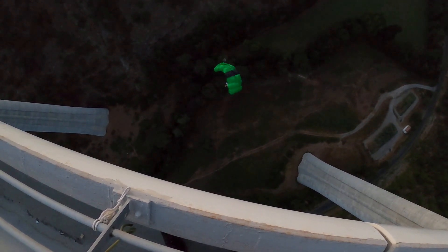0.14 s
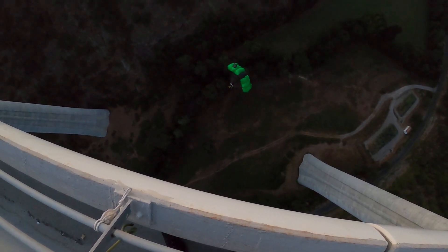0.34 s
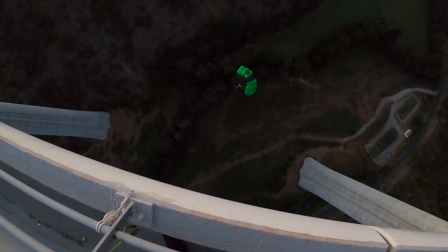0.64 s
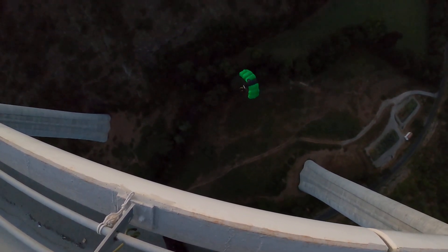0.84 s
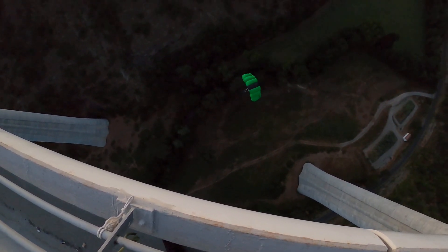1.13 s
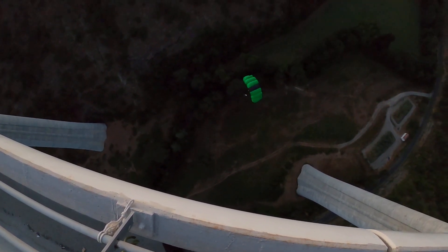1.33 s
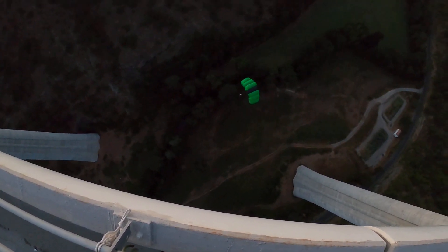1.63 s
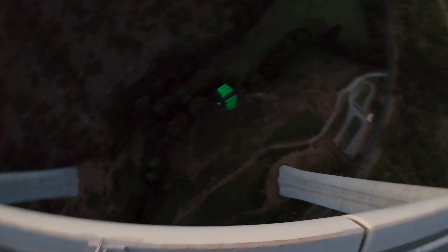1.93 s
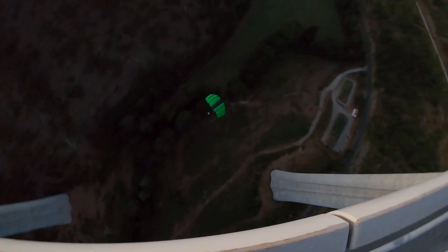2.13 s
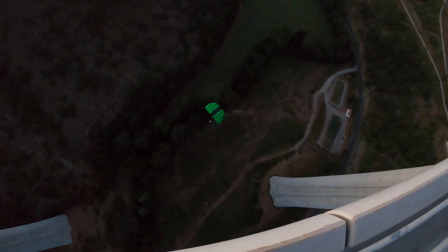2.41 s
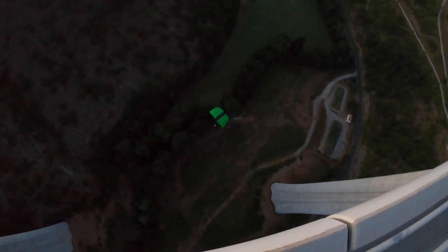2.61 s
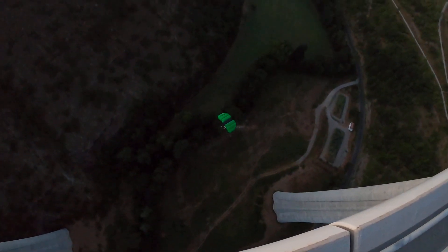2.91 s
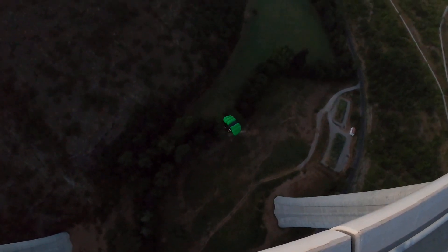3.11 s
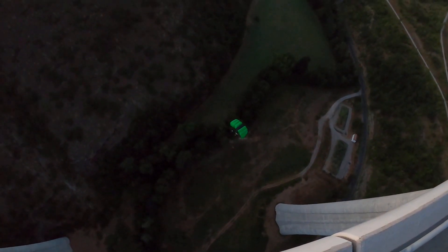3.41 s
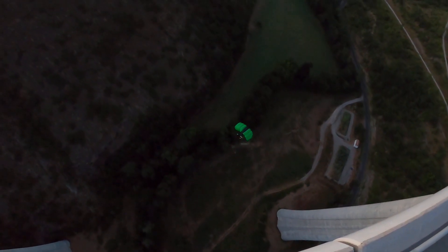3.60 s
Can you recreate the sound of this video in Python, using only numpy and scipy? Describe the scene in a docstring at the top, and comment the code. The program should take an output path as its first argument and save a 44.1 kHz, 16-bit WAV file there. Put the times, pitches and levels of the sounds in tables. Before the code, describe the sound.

Outdoors on a high road bridge, a canopy cracks open with rapid cloth slaps, echoes softly once, and leaves steady traffic wash, faint ticks, engine drone and low gusts at the microphone.

```python
"""A high road bridge over a valley: a parachute cracks open far below and the valley floor sends the bang back.
Cloth is banded noise with crackles, slaps and ticks are short rings; the echo is a late, smeared, dull copy.
Traffic on the deck, mostly to the left, is banded noise for tyres and rumble with a wavering engine drone.
A gust buffets the two microphone ports as lumpy low noise."""
import sys
import numpy as np
from scipy import signal
from scipy.fft import rfft, irfft, next_fast_len
from scipy.io import wavfile

SR = 44100
rng = np.random.default_rng(int(sys.argv[2]) if len(sys.argv) > 2 else 0)


def to_wav(sig):
    """Store sig (one row per channel, or 1-D mono) as 16-bit WAV at the path in sys.argv[1].

    Samples outside -1..1 are clipped; the rate is SR.
    """
    pcm = np.clip(np.atleast_2d(sig), -1, 1) * 32767
    pcm = np.round(pcm).astype(np.int16)
    wavfile.write(sys.argv[1], SR, pcm.T)  # frames by channels


def gain_from_db(level_db):
    """Turn a decibel level (scalar or array-like) into a linear amplitude factor."""
    decades = np.asarray(level_db, float) / 20
    return 10 ** decades


N = 165375

# opening canopy: start_s, cloth_db (before the trims), roar_db of air filling the cells (relative to cloth_db)
OPENING = [(0, -45.5, 31), (.04, -43.5, -9.5), (.09, -42.5, 15.5), (.145, -31, -4.5), (.2, -32.5, 18),
           (.228, -28, 13), (.27, -25, 12.5), (.325, -26, 13.5), (.352, -29, 11.5), (.38, -27.5, 17),
           (.455, -30.5, 0.5), (.475, -31.5, 4.5), (.5, -36.5, 3), (.545, -42.5, 8.5), (.61, -46, 19),
           (.68, -54, -7.5), (.86, -62, -2)]
# slaps of cells snapping full: start_s, level_db, pitch_hz
SLAPS = [(.002, -24, 123), (.067, -20, 299), (.164, -14.5, 160), (0.1893, -6, 218), (0.215, -21, 145),
         (0.242, -8, 191), (0.259, -5, 162), (.282, -21, 205), (0.295, -4, 240), (0.305, -9, 199),
         (.319, -1.5, 190), (0.331, -14, 184), (0.366, -15, 214), (.381, -8.5, 267), (0.403, -19, 144),
         (0.427, -25, 149)]
# small ticks of lines and gear: start_s, level_db, pitch_hz, left_minus_right_db
TICKS = [(0.1873, -19, 1230, -1), (0.04, -30, 2660, 2), (0.07, -33, 2530, 1), (.460, -16.5, 3500, .1),
         (.398, -24, 5300, 0), (0.547, -35, 2600, -8), (0.605, -27, 2470, -2.5), (0.659, -41, 4200, -1),
         (.693, -35.5, 3540, -5.5), (0.738, -35, 2720, -1.1), (0.808, -52.5, 6880, 6),
         (0.832, -43, 4040, -4), (0.855, -30.5, 1234, 1), (1.233, -45, 5900, 6), (1.384, -33, 2520, -3),
         (2.213, -38, 4820, 8), (2.303, -44, 4340, 2.5), (2.449, -31, 2200, -1), (2.467, -32.5, 4630, -3.5)]
# spectrum of the cloth rustle: freq_hz, level_db (per Hz)
RUSTLE_SPECTRUM = [(200, -27), (320, -4.5), (420, -5.5), (750, -4.5), (1050, -5), (1450, -13), (1650, -8),
                   (2250, -16.5), (2700, -8.5), (3100, -14), (4250, -14.5), (4700, -17.5), (7200, -26.5),
                   (16000, -35.5)]
# spectrum of the air roaring into the cells: freq_hz, level_db (per Hz)
ROAR_SPECTRUM = [(15, -35), (25, -27), (49, -4.5), (81, -24.5), (110, -11.5), (150, -2.5), (199, -1),
                 (270, -10), (350, -6), (430, -13.5), (600, -17.5), (780, -34), (1320, -85.5)]
# stereo image of the canopy: freq_hz, left_right_likeness (-1 to 1), left_lead_rad
CLOTH_ALIKE = [(61.2, 1, 0.32), (240, .99, -.05), (1010, 1, -0.28), (2240, 0.94, -0.54),
               (4300, 0.87, -0.44), (8000, 0.6, -1.1)]
# traffic: start_s, tyre_roar_db, tyre_hiss_db, high_air_db, left_minus_right_db, rumble_db
TRAFFIC = [(0, -37.5, -66, -59, -1, -34.5), (.5, -37.5, -51, -66, -2.5, -34.5),
           (.75, -44, -60.5, -62, 3.5, -40), (1.1, -38.5, -50, -50.5, -1, -34),
           (1.4, -36, -49.5, -51.5, 4, -35), (1.7, -38.5, -41.5, -54.5, 6, -34),
           (2.0, -38, -41.5, -53.5, 6, -33.5), (2.2, -38, -42, -52.5, 4.5, -30.5),
           (2.32, -36, -43.5, -58, 3.5, -33), (2.5, -37.5, -45.5, -54.5, 4.5, -28.5),
           (2.8, -40, -45, -60, 4.5, -29), (3.0, -37, -49.5, -58.5, 3.5, -28.5),
           (3.2, -34, -43, -58, 3, -31), (3.33, -34.5, -40, -57, 4, -31), (3.55, -36, -39.5, -54, 4, -31),
           (3.75, -34.5, -39.5, -56.5, 3.5, -30)]
# spectrum of the tyre roar: freq_hz, level_db (per Hz)
TYRE_SPECTRUM = [(210, -19.5), (350, 1), (630, -3.5), (930, 0), (1250, -6), (1700, -10), (2500, -22),
                 (4000, -46), (6000, -69.5)]
# spectrum of the tyre hiss: freq_hz, level_db (per Hz)
HISS_SPECTRUM = [(700, -39), (1250, -5), (1700, 3.8), (2600, -0.3), (3400, -7.5), (4200, -16.5),
                 (5500, -43.5), (8000, -71)]
# brightness of the tyre hiss: start_s, slope_db (per octave about 2 kHz)
HISS_COLOUR = [(0, 1.5), (1.3, 4), (1.9, -1.5), (2.2, 1.8), (2.8, -8.5), (3.1, 4.5), (3.45, -1),
               (3.75, -2.5)]
# a hump in the tyre noise that wanders in pitch: start_s, centre_hz, height_db
HUMP = [(1.2, 2540, 4.5), (1.45, 2230, 2.5), (1.7, 1500, 2), (1.95, 1147, 8.5), (2.15, 1300, 3),
        (2.5, 1700, 3.5), (2.9, 1000, 2), (3.15, 2300, 0.5), (3.3, 2560, 2.5), (3.45, 2580, 5),
        (3.6, 2300, 4), (3.75, 1600, 1)]
# spectrum of the high air of the traffic: freq_hz, level_db (per Hz)
AIR_SPECTRUM = [(1500, -47.5), (2800, -5), (4000, -4.5), (5100, -8.5), (6300, -15.5), (7400, -24.5),
                (16000, -41)]
# spectrum of a faint top hiss: freq_hz, level_db (per Hz)
SHEEN_SPECTRUM = [(4500, -44), (6300, -8.5), (7100, 2), (7800, 4.5), (16000, -14.5)]
# course of the top hiss: start_s, level_db
SHEEN_LEVEL = [(0, -68), (.85, -78), (1.4, -64), (2.3, -64.5), (2.8, -70.5), (3.2, -61.5), (3.75, -65)]
# stereo image of the tyres: freq_hz, left_right_likeness (-1 to 1), left_lead_rad
ROAD_ALIKE = [(300, 0.98, -0.26), (500, 0.85, -.2), (1000, 0.52, -0.12), (2000, .7, -1.05),
              (2980, 0.46, -0.71), (4200, 0.3, 0.36), (5370, 0.45, 1.5), (8050, 0.26, 0.76)]
# spectrum of the engine and deck rumble: freq_hz, level_db (per Hz)
RUMBLE_SPECTRUM = [(15, -38.5), (25, -16.5), (60, -5), (97, -4.5), (162, -6.5), (248, -8.5), (340, -16),
                   (450, -24), (650, -42.5), (1100, -98.5)]
# stereo image of the rumble: freq_hz, left_right_likeness (-1 to 1), left_lead_rad
RUMBLE_ALIKE = [(60, .995, 0), (130, .995, .03), (250, .98, 0), (500, .9, -.1)]
# engine drone: start_s, pitch_hz, level_db
DRONE = [(1.6, 115.3, -44), (2.05, 110.9, -38.5), (2.15, 110, -30), (2.25, 107.9, -39.5), (2.4, 104.8, -50),
         (3.0, 100.7, -44), (3.27, 97.8, -28.5), (3.5, 87.9, -35.5), (3.75, 88, -46)]
# wind on the ports: start_s, level_db
GUST = [(0, -42), (.17, -39.5), (.35, -70), (.7, -40), (.85, -51.5), (1.4, -59.5), (1.75, -42), (2.25, -57),
        (2.42, -26), (2.7, -26.5), (2.85, -43), (2.97, -31.5), (3.04, -45.5), (3.12, -64), (3.75, -69)]
# spectrum of the buffeting: freq_hz, level_db (per Hz)
BUFFET_SPECTRUM = [(20, -13.5), (45, 10), (80, -2), (140, -8.5), (250, -48), (400, -67.5)]
# stereo image of the wind: freq_hz, left_right_likeness (-1 to 1), left_lead_rad
WIND_ALIKE = [(20, 0.47, 0.005), (300, 0.54, 0.006)]
# microphone response: freq_hz, gain_db
MIC_RESPONSE = [(20, 0.5), (7400, -1.04), (7900, -11.5), (8400, -16.5), (10000, -22.5), (12000, -27.5),
                (15000, -40)]

RUSTLE_TRIM_DB, ROAR_TRIM_DB = 8, -3.5
CRACKLES_PER_S, CRACKLE_DB, CRACKLE_SPREAD_DB = 490, -8, 4.5
SLAP_SWELL_CYCLES, SLAP_CRACK_DB = 0.46, -11.5
TICK_SWELL_CYCLES, TICK_SPIT_DB, TICK_SPIT_S = 1.6, 5, 0.001
BANG_S, ECHO_S = 0.21, 0.922  # the sound leaving at BANG_S is back at ECHO_S
ECHO_DB, ECHO_FADE_DB_PER_S = -12.5, 8
ECHO_END_S, ECHO_END_DB_PER_S = 1.077, 70  # an extra fade sets in here
ECHO_LOW_HZ, ECHO_CUT_HZ, ECHO_TOP_HZ, ECHO_SMEAR_S = 110, 1340, 3600, 0.016
FALL_M_PER_S, SOUND_M_PER_S = 55, 343
HUMP_OCTAVES, AIR_PATCHY_DB = 0.38, 1.2
DRONE_WAVER_HZ, DRONE_STEADY = 15, 0.9  # steady tone against its wavering part
HISS_LEFT_DB, RUMBLE_LEFT_DB, BUFFET_LEFT_DB = 6, 1, 2.5  # left minus right
OVERLOAD = 1  # ceiling of the rounded peaks


def rms_one(x):
    """Scale to rms 1."""
    return x / np.sqrt(np.mean(x ** 2) + 1e-20)


def in_time(rows):
    """Draw straight lines through each column of a timed table."""
    s, *columns = np.transpose(rows)
    return [np.interp(np.arange(N) / SR, s, c) for c in columns]


def at_hz(points, hz, column=1):
    """Read a column of a frequency table along a log axis."""
    points = np.array(points)
    return np.interp(np.log(hz), np.log(points[:, 0]), points[:, column])


def pan(x, db):
    """Set left against right by a level difference in dB."""
    return x * gain_from_db(np.array([db / 2, -db / 2]).reshape(2, -1))


def white():
    """Two independent pairs of white noise."""
    return rng.standard_normal((2, 2, N))


def drift(rate):
    """Slow chance with spread 1: noise through two low-pass poles at rate Hz."""
    r = np.exp(-80 * np.pi * rate / SR)  # runs at SR / 40
    slow = signal.lfilter([1], [1, -2 * r, r * r], rng.standard_normal(N // 40 + 2002))[2000:]
    return np.interp(np.arange(N) / 40, np.arange(len(slow)), rms_one(slow))


def ring(s, db, hz, cycles):
    """A sine that swells over the given cycles and then dies, starting with a pull."""
    u = np.clip((np.arange(N) / SR - s) * hz / cycles, 0, 40)
    return -gain_from_db(db) * u * np.exp(1 - u) * np.sin(2 * np.pi * u * cycles)


def colour(x, points):
    """Shape the spectrum with a table of gains in dB."""
    size = next_fast_len(N + 4096)
    hz = np.arange(size // 2 + 1) * SR / size + 1
    return irfft(rfft(x, size) * gain_from_db(at_hz(points, hz)), size)[..., :N]


def banded(source, spectrum, alike_at, patchy_db, flicker, slope_db=0, hump=(1000, 0)):
    """Coloured stereo noise in third-octave bands, each with flicker, likeness and phase between ports; rms 1."""
    out, together = 0, drift(flicker)
    source = colour(source, spectrum)
    edges = 20 * 2 ** (np.arange(30) / 3)
    hump_hz, hump_db = hump
    for k, (low, high) in enumerate(zip(edges, edges[1:])):
        hz = np.sqrt(low * high)
        if at_hz(spectrum, hz) < -60:  # too faint to matter
            continue
        band = signal.butter(2, [low, high], "band", fs=SR, output="sos")
        mid, side = signal.sosfilt(band, source[k % 2])
        alike = np.clip(at_hz(alike_at, hz), -1, 1)
        lead = at_hz(alike_at, hz, column=2) / 2
        ahead = rms_one(np.gradient(mid)) * np.std(mid)  # a quarter cycle early
        mid = np.cos(lead) * mid + np.sin(lead) * ahead * [[1], [-1]]
        stereo = np.sqrt(1 + alike) * mid + np.sqrt(1 - alike) * side * [[1], [-1]]
        level_db = hump_db * np.exp(-(np.log2(hz / hump_hz) / HUMP_OCTAVES) ** 2)
        level_db = level_db + patchy_db * (0.9 * together + 0.44 * drift(flicker))
        level_db = level_db + slope_db * np.log2(hz / 2000)
        out = out + gain_from_db(level_db) * stereo
    return rms_one(out)


def cloth_rustle():
    """Cloth rustles as noise strewn with crackles of widely varied size."""
    size_db = CRACKLE_SPREAD_DB * np.minimum(rng.exponential(1, (2, N)), 5)
    sizes = gain_from_db(size_db) * rng.choice([-1, 1], (2, N))
    crackle = rms_one(sizes * (rng.random((2, N)) < CRACKLES_PER_S / SR))
    return banded(white() + gain_from_db(CRACKLE_DB) * crackle, RUSTLE_SPECTRUM, CLOTH_ALIKE, patchy_db=2.5, flicker=40)


def cell_slaps():
    """Each cell snapping full gives a very short low ring and a fainter, higher crack."""
    out = 0
    for s, db, hz in SLAPS:
        out = out + ring(s, db, hz, SLAP_SWELL_CYCLES)
        out = out + ring(s, db + SLAP_CRACK_DB, 1.834 * hz, 0.92)
    return out


def canopy():
    """Air roars into the cells, the cloth rustles in dense crackles, full cells slap."""
    cloth_db, roar_db = in_time(OPENING)
    fade = np.clip((OPENING[-1][0] - np.arange(N) / SR) / 0.017, 0, 1)
    rustle = gain_from_db(RUSTLE_TRIM_DB) * cloth_rustle()
    roar = banded(white(), ROAR_SPECTRUM, CLOTH_ALIKE, patchy_db=3.5, flicker=15)
    roar = gain_from_db(roar_db + ROAR_TRIM_DB) * roar
    return fade * gain_from_db(cloth_db) * (rustle + roar) + cell_slaps()


def valley_echo(x):
    """Rough ground returns a late, smeared, dull copy; the fall toward the ground squeezes it in time."""
    t = np.arange(N) / SR
    scatter = rfft(rng.standard_normal(8192) * np.exp(-t[:8192] / ECHO_SMEAR_S))
    smear = irfft(scatter / np.abs(scatter))  # flat spectrum, scattered phase
    back = signal.fftconvolve(x, smear[None], axes=1)[:, :N]
    body = signal.butter(1, [ECHO_LOW_HZ, ECHO_CUT_HZ], "band", fs=SR, output="sos")
    top = signal.butter(2, ECHO_TOP_HZ, fs=SR, output="sos")
    back = signal.sosfilt(np.vstack([body, top]), back)
    squeeze = (SOUND_M_PER_S + FALL_M_PER_S) / (SOUND_M_PER_S - FALL_M_PER_S)
    sent_s = BANG_S + (t - ECHO_S) * squeeze
    late = np.array([np.interp(sent_s, t, c, left=0) for c in back])
    level_db = ECHO_DB - ECHO_FADE_DB_PER_S * (t - ECHO_S)
    level_db = level_db - ECHO_END_DB_PER_S * np.maximum(t - ECHO_END_S, 0)
    return gain_from_db(level_db) * late


def ticks():
    """Lines and gear tick: a short ring at its pitch with a spit of noise spread broadly around it."""
    t, out = np.arange(N) / SR, 0
    for s, db, hz, left_db in TICKS:
        start = int(s * SR)
        spit = np.zeros(N)
        spit[start:start + 1024] = rng.standard_normal(1024) * np.exp(-t[:1024] / TICK_SPIT_S)
        around = signal.butter(2, [0.24 * hz, min(1.27 * hz, 15000)], "band", fs=SR, output="sos")
        spit = signal.sosfilt(around, spit + 1e-18)
        tick = ring(s, db, hz, TICK_SWELL_CYCLES) + gain_from_db(db + TICK_SPIT_DB) * spit
        out = out + pan(tick, left_db)
    return out


def tyre_noise(roar_db, hiss_db, air_db):
    """Tyre roar, hiss that swells as a vehicle nears, high air and a faint top hiss, all as banded noise."""
    hump = in_time(HUMP)
    slope_db, = in_time(HISS_COLOUR)
    sheen_db, = in_time(SHEEN_LEVEL)
    roar = banded(white(), TYRE_SPECTRUM, ROAD_ALIKE, patchy_db=1.5, flicker=3.8, hump=hump)
    hiss = banded(white(), HISS_SPECTRUM, ROAD_ALIKE, patchy_db=1.6, flicker=5.7, slope_db=slope_db, hump=hump)
    air = banded(white(), AIR_SPECTRUM, ROAD_ALIKE, patchy_db=AIR_PATCHY_DB, flicker=11)
    sheen = banded(white(), SHEEN_SPECTRUM, ROAD_ALIKE, patchy_db=AIR_PATCHY_DB, flicker=8)
    hiss = pan(gain_from_db(hiss_db) * hiss, HISS_LEFT_DB)
    return gain_from_db(roar_db) * roar + hiss + gain_from_db(air_db) * air + gain_from_db(sheen_db) * sheen


def engine_drone():
    """An engine tone of gliding pitch: a steady part plus a part whose strength and phase waver."""
    hz, level_db = in_time(DRONE)
    phase = 2 * np.pi * np.cumsum(hz) / SR
    tone = (DRONE_STEADY + drift(DRONE_WAVER_HZ)) * np.cos(phase)
    tone = tone + drift(DRONE_WAVER_HZ) * np.sin(phase)
    return gain_from_db(level_db) * tone / np.sqrt(1 + DRONE_STEADY ** 2 / 2)


def traffic():
    """Vehicles roll past on the deck: moving tyre noise over a low rumble and an engine drone."""
    roar_db, hiss_db, air_db, left_db, rumble_db = in_time(TRAFFIC)
    tyres = tyre_noise(roar_db, hiss_db, air_db)
    rumble = banded(white(), RUMBLE_SPECTRUM, RUMBLE_ALIKE, patchy_db=-0.46, flicker=13)
    low = gain_from_db(rumble_db) * rumble + engine_drone()
    return pan(tyres, left_db) + pan(low, RUMBLE_LEFT_DB)


def wind():
    """Gusts buffet the ports: lumpy low noise, only about half alike left and right."""
    gust_db, = in_time(GUST)
    buffet = banded(white(), BUFFET_SPECTRUM, WIND_ALIKE, patchy_db=0, flicker=6.7)
    return pan(gain_from_db(gust_db) * buffet, BUFFET_LEFT_DB)


def scene():
    """The canopy and its echo, the ticks, the traffic and the wind together."""
    cloth = canopy()
    return cloth + valley_echo(cloth) + ticks() + traffic() + wind()


def band_limit(x):
    """A steep low-pass at the top of the band."""
    return signal.sosfilt(signal.butter(12, 15600, fs=SR, output="sos"), x)


def record(dry):
    """Peaks are rounded; the microphone drops steeply in the top octave."""
    rounded = OVERLOAD * np.tanh(dry / OVERLOAD)
    mix = colour(rounded, MIC_RESPONSE)
    return band_limit(mix)


dry = scene()
out = record(dry)
to_wav(out)
```